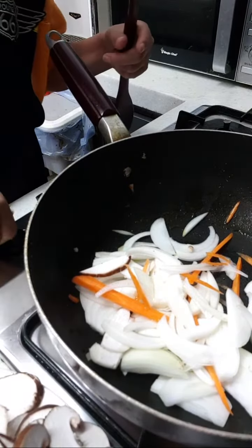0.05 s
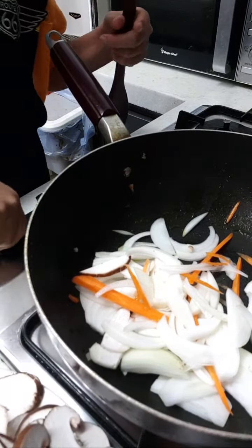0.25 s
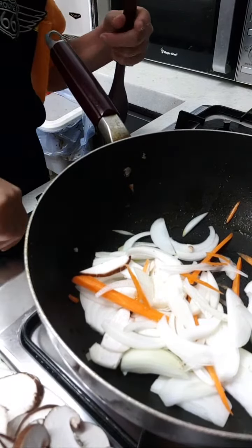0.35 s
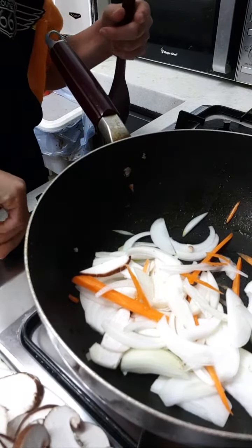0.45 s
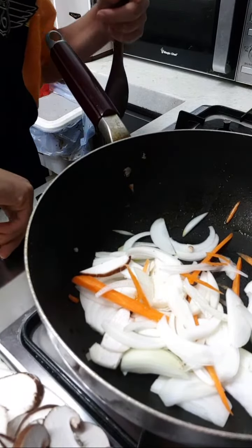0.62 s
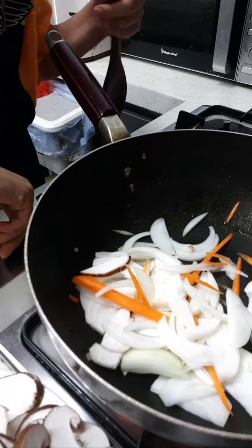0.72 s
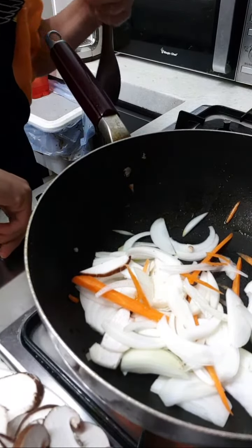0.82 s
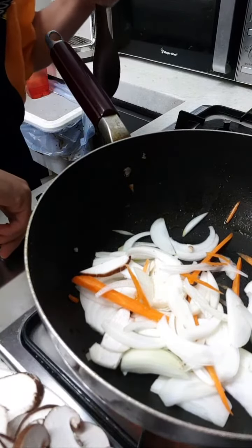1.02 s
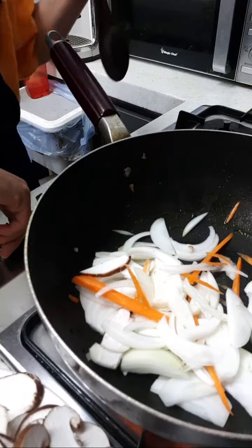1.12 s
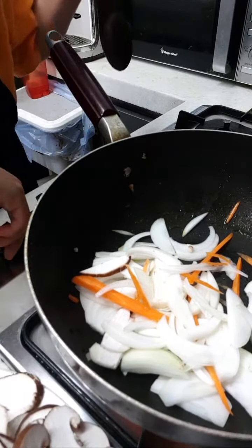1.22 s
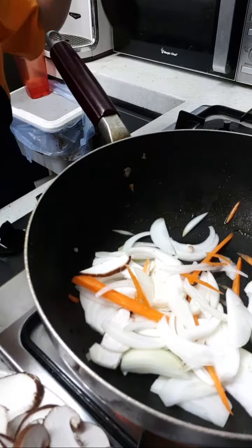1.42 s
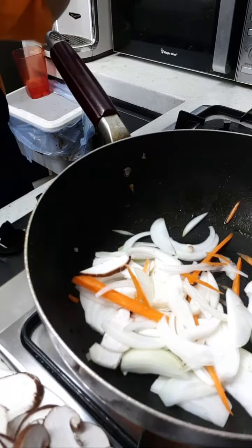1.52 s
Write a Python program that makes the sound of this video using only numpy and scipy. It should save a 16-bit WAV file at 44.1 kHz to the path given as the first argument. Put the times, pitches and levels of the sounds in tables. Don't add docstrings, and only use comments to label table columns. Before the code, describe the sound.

A gas stove igniter snaps eight times in quick, even succession, close and bright in a small kitchen; at the third click the gas lights with a brief low, lumpy rush, then settles quietly.

```python
import sys
import numpy as np
from scipy import signal
from scipy.io import wavfile

SR = 44100
rng = np.random.default_rng(int(sys.argv[2]) if len(sys.argv) > 2 else 0)


def decibels_to_gain(level_db):
    exponent = np.asarray(level_db, float) / 20
    return 10 ** exponent


def generate_wav(sig):
    pcm = np.round(np.clip(np.atleast_2d(sig).T, -1, 1) * 32767).astype(np.int16)
    wavfile.write(sys.argv[1], SR, pcm)


N = 68355
T = np.arange(N) / SR


def rms_one(x):
    return x / np.sqrt(np.mean(x ** 2) + 1e-20)


def in_time(rows):
    return np.interp(T, *np.transpose(rows))


def drift(rate_hz):
    r = np.exp(-2 * np.pi * rate_hz / SR)
    wander = signal.lfilter([1], [1, -2 * r, r * r], rng.standard_normal(N + SR))
    return rms_one(wander[SR:])


def fade(start_s, rise_s, t60_s):
    age_s = np.maximum(T - start_s, 0)
    return (1 - np.exp(-(age_s / rise_s) ** 2)) * decibels_to_gain(-60 * age_s / t60_s)


def band_pass(x, order, low_hz, high_hz):
    return signal.sosfilt(signal.butter(order, [low_hz, high_hz], "band", fs=SR, output="sos"), x)


def peaks(x, rows):
    out = 0
    for k, (pitch_hz, width_hz, level_db) in enumerate(rows):
        r = np.exp(-np.pi * width_hz / SR)
        b = decibels_to_gain(level_db) * (-1) ** k * (1 - r * r) / 2 * np.array([1, 0, -1])
        a = [1, -2 * r * np.cos(2 * np.pi * pitch_hz / SR), r * r]
        out = out + signal.lfilter(b, a, x)
    return out


def bands(x, spectrum, patchy_db, rate_hz):
    pitch_hz, level_db = np.transpose(spectrum)
    count = int(4 * np.log2(pitch_hz[-1] / pitch_hz[0])) + 2
    edges_hz = np.geomspace(pitch_hz[0], pitch_hz[-1], count)
    out, together = 0, drift(rate_hz / 3)
    for k, (low_hz, high_hz) in enumerate(zip(edges_hz, edges_hz[1:])):
        band_db = np.interp(np.log(low_hz * high_hz) / 2, np.log(pitch_hz), level_db)
        band_db = band_db + patchy_db * (0.73 * together + drift(rate_hz))
        out = out + decibels_to_gain(band_db) * band_pass(x[k % 2], 2, low_hz, high_hz)
    return out


# start_s, peak_db, dull_db, upper_db, crack_db
SPARKS = [
    (0.2276, -9, -18.5, -10.5, 9),
    (0.362, -7, -20, -11.5, 12),
    (0.4916, -7, -17, -8.5, 8),
    (0.6185, -3.5, -24, -21, 7.5),
    (0.7458, -6.5, -23.5, -25, 11),
    (0.8717, -6.5, -23, -16, 9.5),
    (0.999, -5.5, -24.5, -24.5, 13),
    (1.127, -10.5, -21, -12, 8),
]
GAP_HZ = [9500, 11750, 13050, 15350, 14200, 10700]
# width_hz, level_db
GAP_PEAKS = [(1388.9, -7), (463, 3.84), (500, -7), (455, -0.5), (1490, -17.5), (600, -9)]
# pitch_hz, width_hz, level_db
BROAD = [(12900, 3350, -12.0)]
# pitch_hz, level_db [dB per Hz]
DULL_SPECTRUM = [(470, -61), (800, -12), (1350, -2.5), (2100, -16.5), (3790, 4.5), (4120, -20), (5610, 4),
                 (7500, 5.5), (9750, -21), (16500, -120)]
DULL_HZ = [1250, 2450, 3700, 4750, 5700, 6400]
# width_hz, level_db
DULL_PEAKS = [(330, -19), (297, -16.0), (270, -4.0), (248, -1), (264, 0), (287, -10.5)]
SPARK_DB, DULL_DB, UPPER_DB, DULL_CRACK_DB = -8, 13.5, 14, 2
RISE_S, CRACK_LAG_S, RATTLE_T60_S, DULL_T60_S, ECHOES_PER_S = 0.0011, 0.0012, 0.056, 0.079, 11000
COIL_LEAD_S, COIL_DB, COIL_T60_S = 0.0033, -25.5, 0.023
KITCHEN_RISE_S, KITCHEN_T60_S, KITCHEN_DB = 0.0028, 0.21, -17.5


def sparks():
    share = ECHOES_PER_S / SR
    echoes = rng.standard_normal((4, N)) * (rng.random((4, N)) < share) / np.sqrt(share)
    tail = rng.standard_normal((4, N))
    start_s, peak_db, dull_db, upper_db, crack_db = np.transpose(SPARKS)

    def burst(t60_s, level_db, crack_db):
        near, far, crack = np.zeros(N), np.zeros(N), np.zeros(N)
        for s, db in zip(start_s, level_db):
            rattle = fade(s - RISE_S, RISE_S, t60_s)
            coil = decibels_to_gain(COIL_DB) * fade(s - RISE_S - COIL_LEAD_S, RISE_S / 2, COIL_T60_S)
            near += decibels_to_gain(db) * (rattle + coil)
            far += decibels_to_gain(db + KITCHEN_DB) * fade(s, KITCHEN_RISE_S, KITCHEN_T60_S)
        crack[((start_s + CRACK_LAG_S) * SR).astype(int)] = decibels_to_gain(level_db + crack_db)
        return near * echoes + far * tail + crack + 1e-18

    gap = [(hz, *row) for hz, row in zip(GAP_HZ, GAP_PEAKS)]
    top = burst(RATTLE_T60_S, peak_db, crack_db)
    top = peaks(top[0], gap[1:]) + peaks(top[1], BROAD)
    upper = burst(RATTLE_T60_S, peak_db + upper_db + UPPER_DB, crack_db)
    upper = peaks(upper[2], gap[:1])
    steep = signal.butter(2, 7500, "high", fs=SR, output="sos")
    bright = signal.sosfilt(steep, top + upper)

    dull = burst(DULL_T60_S, peak_db + dull_db + DULL_DB, crack_db + DULL_CRACK_DB)
    dull_ring = peaks(dull[1], [(hz, *row) for hz, row in zip(DULL_HZ, DULL_PEAKS)])
    dull_wash = bands(dull[2:], DULL_SPECTRUM, patchy_db=-1.1, rate_hz=25)
    return decibels_to_gain(SPARK_DB) * (3.1 * bright + 0.5 * dull_wash + 2.01 * dull_ring)


# start_s, level_db
FLAME = [(0.46, -71), (0.504, -41.5), (0.526, -34.5), (0.614, -29), (0.632, -43.5), (0.66, -27.5),
         (0.69, -28.5), (0.772, -33), (0.8, -47.5), (0.894, -43), (0.944, -51), (1.024, -42.5),
         (1.044, -44.5), (1.228, -45.5), (1.258, -46), (1.378, -51), (1.516, -45), (1.55, -52)]
# pitch_hz, level_db [dB per Hz]
RUMBLE = [(18, -47), (30, -21.5), (113, -3), (210, -7.5), (359, -11), (922, -24.5), (1240, -24.5),
          (2930, -35), (5000, -28.5), (6500, -83), (11000, -120)]
# pitch_hz, width_hz, level_db
BOOM = [(111.6, 14.6, 2.75), (183, 15.7, -1), (261.3, 22.7, -6), (350, 69, -7.5)]
BOOM_DB, RUMBLE_DB = -5, -4
POPS_PER_S, POP_DB, POP_LOW_HZ, POP_HIGH_HZ = 89, -15, 300, 1900
POP_FOLLOWS = 1.47


def flame():
    level_db = in_time(FLAME) - 40 * (T < FLAME[0][0])
    white = rng.standard_normal((3, N))
    rumble = decibels_to_gain(RUMBLE_DB) * rms_one(bands(white, RUMBLE, patchy_db=3.5, rate_hz=12.5))
    boom = decibels_to_gain(BOOM_DB + 2.7 * drift(19)) * rms_one(peaks(white[2], BOOM))
    pops = (rng.random(N) < POPS_PER_S / SR) * decibels_to_gain(1.9 * rng.exponential(1, N)) * rng.choice([-1, 1], N)
    pops = rms_one(band_pass(pops, 1, POP_LOW_HZ, POP_HIGH_HZ))
    pop_db = POP_DB + (POP_FOLLOWS - 1) * (level_db - level_db.max())
    return decibels_to_gain(level_db) * (rumble + boom + decibels_to_gain(pop_db) * pops)


# start_s, peak_db, pitch_hz, t60_s
GULPS = [
    (0.506, -31, 105, 0.38),
    (.53, -32, 66, 0.19),
    (0.672, -44, 105, 0.2),
    (0.688, -27, 77.7, 0.25),
    (0.766, -45, 71, 0.11),
    (1.042, -36, 115, 0.15),
    (1.139, -45, 116, 0.1),
    (1.47, -41, 120, 0.26),
]


def gulps():
    out = np.zeros(N)
    for start_s, peak_db, pitch_hz, t60_s in GULPS:
        age_s = T - start_s
        swing = np.sin(2 * np.pi * pitch_hz * age_s * (1 - 0.71 * age_s))
        out += decibels_to_gain(peak_db + 1.5) * fade(start_s, 0.0086, t60_s) * swing
    return out


# start_s, level_db
GAS = [(0.0, -54), (0.24, -52), (0.452, -47), (0.568, -47.5), (0.724, -48.5), (0.966, -50), (1.55, -49)]
# pitch_hz, level_db [dB per Hz]
HISS = [(1500, -15.5), (3300, -5.5), (5400, -1.5), (8000, -17.5), (10000, -7), (11700, 9.5), (13500, -4.5),
        (16500, 3)]
# pitch_hz, width_hz, level_db
JET_PEAKS = [(12200, 290, 18), (4840, 1100, 7)]


def jet():
    white = rng.standard_normal((3, N))
    hiss = rms_one(bands(white, HISS, patchy_db=1.97, rate_hz=13))
    return decibels_to_gain(in_time(GAS)) * (hiss + 0.56 * peaks(white[2], JET_PEAKS))


# start_s, peak_db, pitch_hz, t60_s
KNOCKS = [(0.1, -48, 650, 0.13), (0.117, -44, 3760, 0.014), (1.25, -49, 1220, 0.11),
          (1.252, -42.5, 600, 0.12), (0.01, -51.5, 500, 0.13), (.541, -40, 1340, .03),
          (.661, -40, 3500, 0.013), (.676, -35.5, 1280, .04), (0.678, -44, 2770, 0.028),
          (0.694, -35.5, 1200, 0.038), (0.734, -34, 1300, .03), (.75, -53, 1390, 0.03)]


def knocks():
    out = np.zeros(N)
    for start_s, peak_db, pitch_hz, t60_s in KNOCKS:
        body = [(pitch_hz, pitch_hz, 0)]
        bump = rms_one(peaks(peaks(rng.standard_normal(N), body), body))
        out += decibels_to_gain(peak_db) * fade(start_s, 0.0029, t60_s) * bump
    return out


# start_s, level_db
STIR = [(0, 3.5), (.09, -5), (.11, 4.0), (.2, -1), (.26, -8), (.48, -3.0), (.8, 1.5), (1.55, 1.5)]
# pitch_hz, level_db [dB per Hz]
ROOM = [(29, -48), (50, -6), (180, -1.5), (313, -4.5), (523, -7), (906, -9.5), (1540, -14), (1850, -32),
        (4000, -12.5), (5200, -46), (8800, -120)]
# pitch_hz, width_hz, level_db
ROOM_HUM = [(105, 52, -5), (168, 7.2, 5.3), (255, 36, -8.5)]
ROOM_DB, HUM_DB = -56, -53.5


def room():
    white = rng.standard_normal((3, N))
    stir_db = in_time(STIR)
    noise = decibels_to_gain(ROOM_DB + stir_db) * rms_one(bands(white, ROOM, patchy_db=1.5, rate_hz=10))
    hum = decibels_to_gain(HUM_DB + 2.9 * drift(4.6) + 0.5 * stir_db) * rms_one(peaks(white[2], ROOM_HUM))
    return noise + hum


def scene():
    background = room()
    bumps = knocks() + gulps()
    return (sparks() + jet() + flame() + bumps + background)[None]


def roll_off(x):
    return signal.sosfilt(signal.butter(12, 16800, fs=SR, output="sos"), x)


def record(dry):
    top = signal.cheby1(9, 1, 15500, fs=SR, output="sos")
    bottom = signal.butter(4, 55, "high", fs=SR, output="sos")
    mix = signal.sosfilt(np.vstack([top, bottom]), dry)
    return roll_off(mix)


dry = scene()
out = record(dry)
generate_wav(out)
```